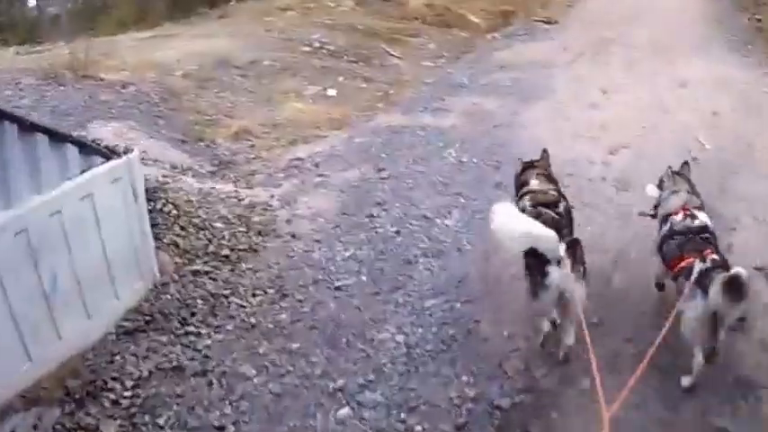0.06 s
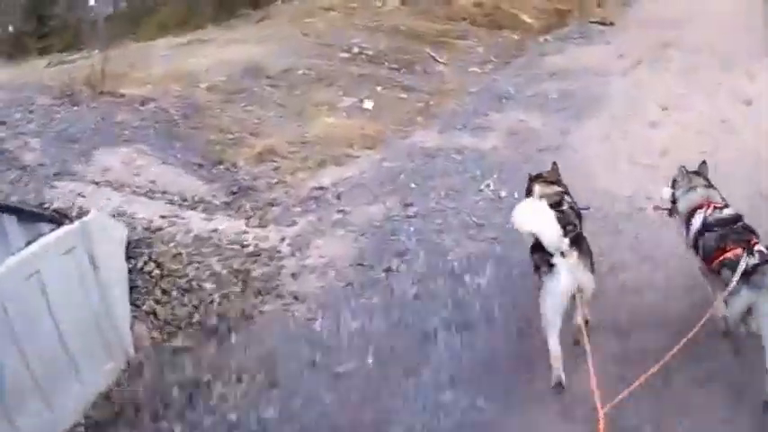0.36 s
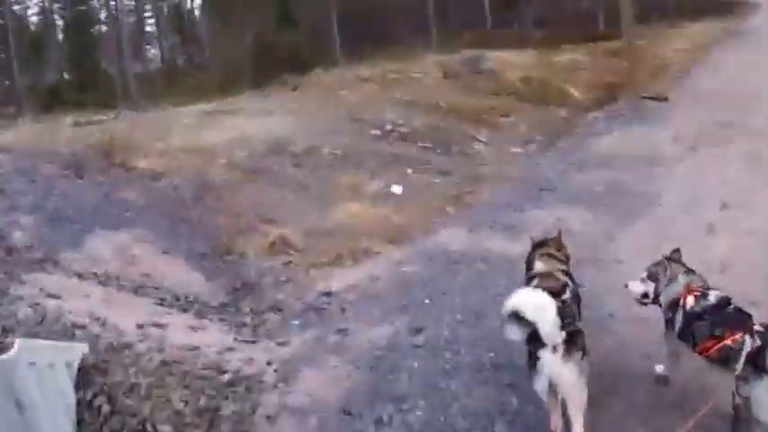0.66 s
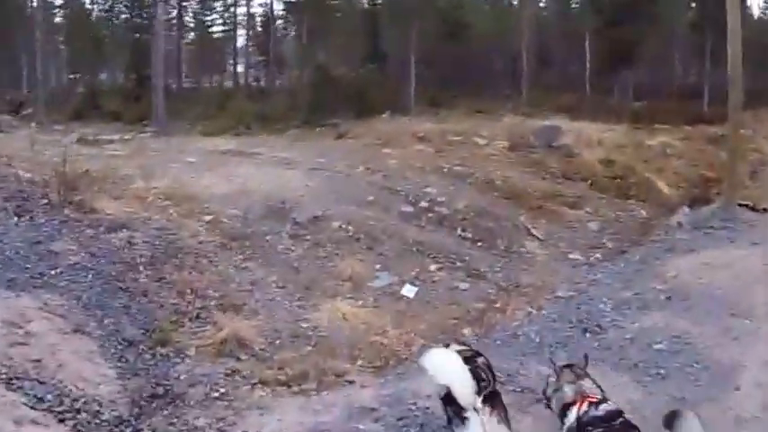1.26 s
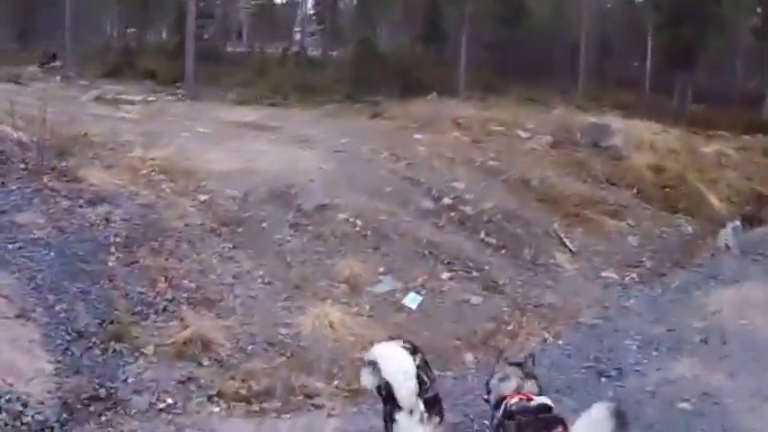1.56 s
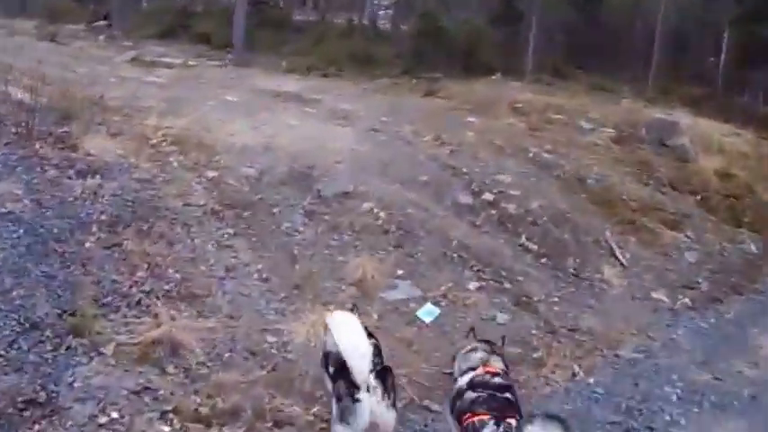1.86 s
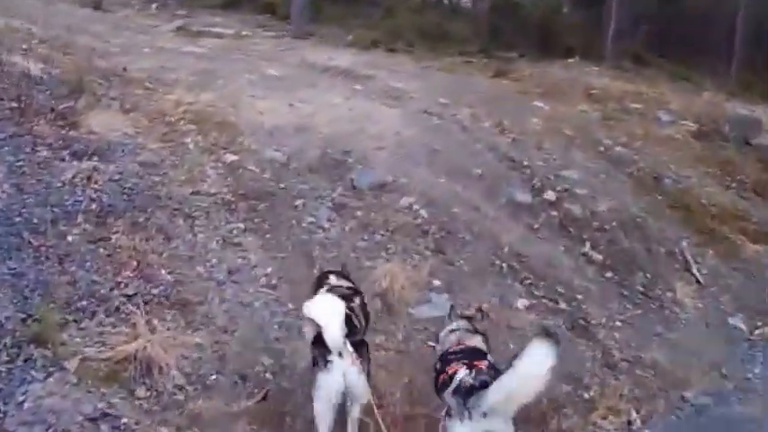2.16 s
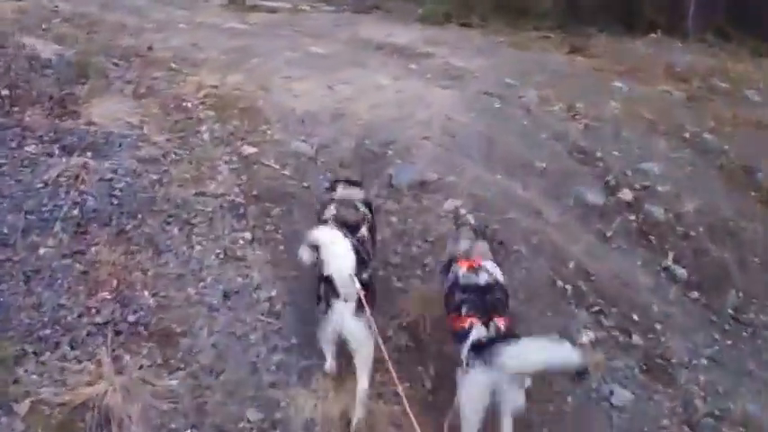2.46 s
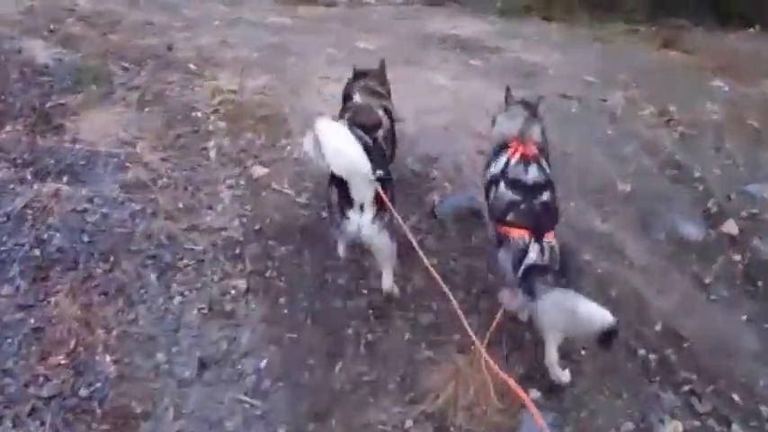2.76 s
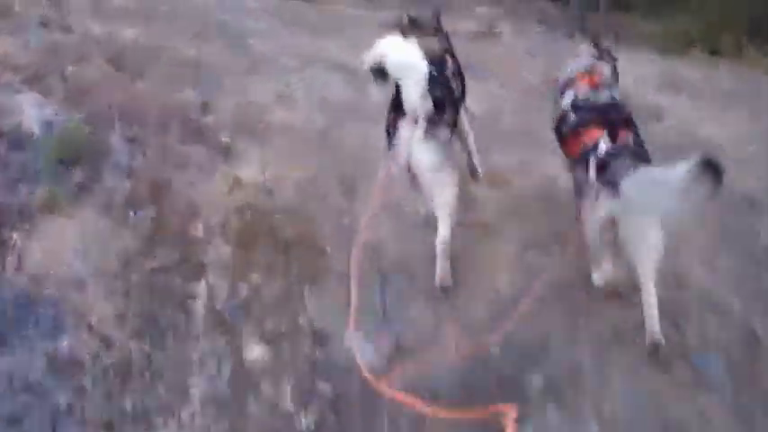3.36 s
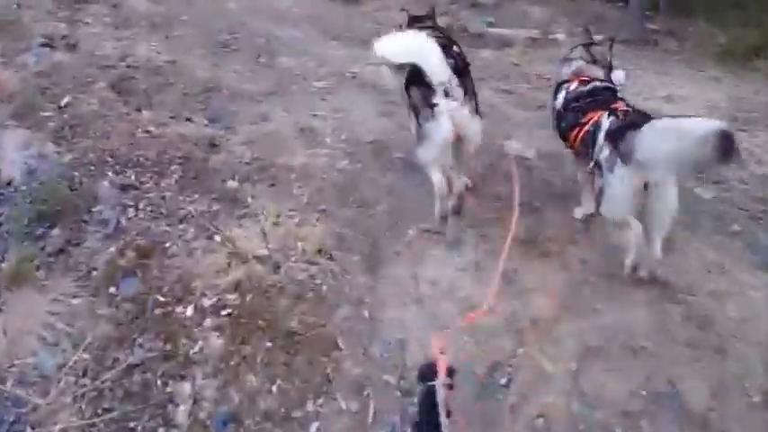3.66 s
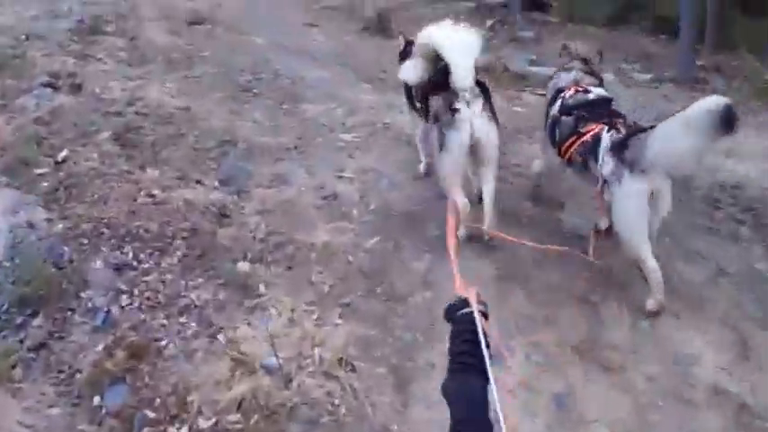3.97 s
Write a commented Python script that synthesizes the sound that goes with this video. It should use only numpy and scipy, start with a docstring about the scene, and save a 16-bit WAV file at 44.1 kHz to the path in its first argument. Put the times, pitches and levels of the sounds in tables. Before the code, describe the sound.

Wind buffets the microphone, fading, while bike tyres crunch over gravel and stones knock.

```python
"""Wind buffets the microphone, close up on a kickbike that two dogs pull off a gravel track and up a
dirt slope; the rumble dies away as the bike slows. Just below, the tyres crunch over stones and spray
grit, and larger stones knock and rattle the bike, ringing in the boxy camera housing.
Farther off, among the trees, a small bird whistles faintly."""
import sys
import numpy as np
from scipy import signal
from scipy.fft import rfft, irfft, next_fast_len
from scipy.io import wavfile
from scipy.ndimage import uniform_filter1d, map_coordinates

SR = 44100
rng = np.random.default_rng(int(sys.argv[2]) if len(sys.argv) > 2 else 0)


def wav_out(sig):
    """Save sig, one row per channel (or a flat mono array), as 16-bit PCM at SR to the path in sys.argv[1]."""
    wavfile.write(sys.argv[1], SR, np.round(np.clip(np.atleast_2d(sig).T, -1, 1) * 32767).astype(np.int16))


N = 176400

# stones shifting under the tyres: t/s, relative level/dB
CRUNCH_LEVEL = [(.4, -43), (1.37, -48), (3.53, -47), (3.78, -51), (4.0, -53.5)]
# fine grit and dust under the tread: t/s, relative level/dB
GRIT_LEVEL = [(0, -44), (.51, -46.5), (.97, -53), (1.86, -67), (2.8, -60), (4.0, -64.5)]
# response of the housing around the microphone: f/Hz, gain/dB
HOUSING_RESPONSE = [(300, -9), (620, -13.5), (870, -5), (1020, -8), (1250, -6), (1550, -4.5), (1780, 0.5),
                    (2050, -11), (2250, -21.5), (2550, -16), (2830, -13.5), (3280, -8), (3750, -21.5),
                    (4800, -26), (6200, -22), (9000, -36.5), (15000, -42)]
RING_HZ = 1950  # the sharpest resonance, which hard knocks bring out
GRAINS_PER_S = 5000


def wind(thump_half_width_s=0.0016):
    """Turbulence right at the microphone port: a rumble over a deep buffet, with a few hard eddies."""
    # strength of the wind: t/s, relative level/dB
    gusts = [(0, -14), (0.1, -27), (0.28, -20.5), (0.54, -22), (0.61, -25.5), (0.81, -29.5), (0.89, -25),
             (1.1, -26.5), (1.22, -22.5), (1.38, -26), (1.62, -24), (1.98, -25), (2.13, -26), (2.25, -29.5),
             (2.62, -33), (2.85, -24), (2.93, -30), (3.15, -29), (3.44, -39.5), (3.53, -32), (3.62, -40.5),
             (3.95, -46), (4.0, -57)]
    # spectrum of the rumble: f/Hz, gain/dB
    rumble_spectrum = [(40, -12), (90, -1), (140, 0.5), (240, -3), (370, -7), (440, -13), (590, -32),
                       (800, -34.5), (1200, -70.5)]
    # spectrum of the deep buffet: f/Hz, gain/dB
    buffet_spectrum = [(8, -9), (20, 1), (75, 0), (120, -11), (600, -99)]
    # pressure pulses of single hard eddies: t/s, peak level/dB
    thumps = [(0.0226, -11), (0.54, -12.5), (1.210, -11), (1.517, -15), (1.634, -12.5), (1.789, -11.5),
              (1.963, -14), (2.843, -12.5)]
    strength = level(gusts)
    rumble = colour(rng.standard_normal(N), lambda f: along(rumble_spectrum, f))
    buffet = colour(rng.standard_normal(N), lambda f: along(buffet_spectrum, f))
    eddies = amp(1.5 * wobble(per_s=45))
    out = amp(-1.5) * strength * unit(rumble * eddies)
    out += amp(-28.5) * unit(buffet * strength ** 0.91)  # swings a little less than the rumble
    for s, db in thumps:
        u = (clock() - s) / thump_half_width_s
        out += amp(db) * (1 - u * u) * np.exp(-u * u / 2)
    return out


def knocks(slip_rise_s=0.0023, scrape_decay_s=0.0039, gain_db=-4):
    """Larger stones hit the bike: a slip, a sharp contact and a brief scrape, ringing in the housing."""
    # stone strikes: t/s, relative peak level/dB, treble tilt/(dB per octave)
    strikes = [(.130, -17.5, -6), (.1362, -16, -6), (.328, -19, -7), (.4262, -19.5, 5), (.4328, -20, 1),
               (.441, -22, 9), (.573, -25, -6), (.616, -24.5, 6.5), (.844, -20, -8.5), (1.499, -24, 5),
               (1.798, -23.5, 5), (1.8598, -22, 2.5), (1.938, -23.5, 0), (2.0637, -24.5, -5.5),
               (2.396, -25, -1), (2.5795, -36, -2), (2.8792, -23, 3.5), (2.886, -23.5, 4.5),
               (2.903, -22.5, 1), (3.3599, -22.5, -13.5), (3.418, -24, 6), (3.527, -24, -5),
               (3.5645, -22, 1.5), (3.609, -20, 1.5), (3.6543, -27.5, -0.5), (3.730, -24.5, 2.5),
               (3.849, -22.5, -8.5)]
    lead = SR // 100  # samples of slip ahead of the contact
    t = (np.arange(SR // 20) - lead) / SR
    friction = np.where(t < 0, 0.2 * np.exp(-abs(t) / slip_rise_s), 0.16 * np.exp(-abs(t) / scrape_decay_s))
    out = np.zeros(N + SR)
    for s, db, tilt_db in strikes:
        force = friction * rng.standard_normal(len(t))
        force[lead] += 2  # the contact itself
        ring = colour(force, lambda f: knock_colour(f, tilt_db) + 0.5 * stone_timbre(f))
        start = round(s * SR) - lead
        out[start:start + len(t)] += amp(db + gain_db) * ring / np.abs(ring).max()
    return out[:N]


def knock_colour(hz, tilt_db, low_hz=1370, high_hz=3530, ring_half_width_hz=64):
    """The housing's answer to a larger stone, in dB: a middle band with one sharp resonance."""
    band = -10 * np.log10((1 + (low_hz / (hz + 1)) ** 6) * (1 + (hz / high_hz) ** 6))
    ring = 4.5 / (1 + ((hz - RING_HZ) / ring_half_width_hz) ** 2)
    tilt = tilt_db * np.log2(np.clip(hz, 500, 5000) / RING_HZ)
    return along(HOUSING_RESPONSE, hz) + band + ring + tilt


def stone_timbre(hz, depth_db=5, spacing_hz=230):
    """A stone's own random resonances, in dB."""
    return depth_db * map_coordinates(rng.standard_normal(128), [hz / spacing_hz], order=1, mode="nearest")


def crunch(stones_per_s=1000, timbres=18):
    """Clumps of small stones shift under the tyres, heard through the housing."""
    stones = np.zeros(N)
    for _ in range(timbres):
        impacts = contacts(stones_per_s / timbres, spread_db=1)
        stones += unit(colour(impacts, lambda f: along(HOUSING_RESPONSE, f) + stone_timbre(f)))
    clumps = amp(0.8 + 2 * wobble(per_s=34.98))
    return clumps * level(CRUNCH_LEVEL) * unit(stones)


def scuffs():
    """A quick run of larger stones rattles as the tyre ploughs through them."""
    # patches of stones: t/s, level/dB, half length/s
    patches = [(.165, -38, 0.01), (.222, -39.5, 0.043), (.45, -34.5, 0.032), (.622, -41.5, 0.035),
               (3.235, -43, 0.035), (3.377, -41, 0.02), (3.562, -35.5, 0.016)]
    stones = contacts(per_s=700, spread_db=1.5)
    return swells(patches) * unit(colour(stones, lambda f: knock_colour(f, tilt_db=0)))


def pebbles(per_s=320, low_hz=1095, high_hz=7600, decay_cycles=7.2):
    """Pebbles clink together in clusters, each with its own short ring."""
    clusters = amp(4 * wobble(per_s=22))
    starts = np.flatnonzero(rng.random(N) < per_s / SR * clusters)
    pitch, force = rng.random((len(starts), 2)).T[:, :, None]
    hz = low_hz * (high_hz / low_hz) ** pitch
    age = np.arange(SR // 40)  # samples
    cycles = hz * age / SR
    small_lift_db = 2.5 * np.log2(hz / RING_HZ)
    gain = amp(along(HOUSING_RESPONSE, hz) + small_lift_db + 2 * force)
    rings = gain * np.sin(2 * np.pi * cycles) * np.exp(-cycles / decay_cycles) * (1 - np.exp(-cycles))
    clinks = np.bincount((starts[:, None] + age).ravel(), rings.ravel(), N)[:N]
    return amp(-6) * level(CRUNCH_LEVEL) * unit(clinks)


def grit():
    """Fine grains fizz under the tread and now and then spray out."""
    # spectrum of the fizz: f/Hz, gain/dB
    fizz_spectrum = [(2500, -75), (4000, -3.5), (4800, -8.5), (6200, 1.5), (7400, -3), (8900, -20),
                     (11000, -18), (15600, -13)]
    # grit thrown from the tyre: t/s, level/dB, half length/s
    sprays = [(.213, -46.5, 0.032), (.266, -41, 0.0084), (.89, -55, 0.049), (1.3, -60, 0.36),
              (1.832, -51, .02), (2.209, -54.5, 0.018), (3.055, -51.5, 0.014), (3.41, -53.5, .019),
              (3.555, -57.5, .07)]
    grains = patchy(contacts(GRAINS_PER_S, spread_db=3))
    under_tread = amp(-5.5 + 0.6 * wobble(per_s=28.6)) * level(GRIT_LEVEL)
    return np.hypot(under_tread, swells(sprays)) * unit(colour(grains, lambda f: along(fizz_spectrum, f)))


def sand(low_edge_hz=10500):
    """The finest sand spits in uneven bursts, thinning with the grit as the bike slows."""
    # sand hitting the bike: t/s, level/dB, half length/s
    spits = [(.204, -44.5, 0.0083), (.269, -56, .011), (.705, -46.5, 0.0087), (.857, -54.5, .015)]
    impacts = contacts(GRAINS_PER_S, spread_db=8)
    grains = colour(impacts, lambda f: -10 * np.log10(1 + (low_edge_hz / (f + 1)) ** 10))
    stream = amp(-63.5) * unit(level(GRIT_LEVEL) ** 0.64 * amp(3.5 * wobble(per_s=33.5)))
    return np.hypot(stream, swells(spits)) * unit(patchy(grains))


def ping(start_s=3.418, t60_s=0.19):
    """One stone sets a thin metal part of the bike ringing faintly."""
    # modes of the metal part: f/Hz, level/dB
    modes = [(3757, -52.5), (9575, -60)]
    t = np.maximum(clock() - start_s, 0)
    return sum(amp(db - 60 * t / t60_s) * np.sin(2 * np.pi * hz * t) for hz, db in modes)


def bird(waver_hz=50, flutter_db=3, forest_db=-8, forest_t60_s=0.12):
    """Thin, unsteady whistles glide in arcs, scattered by the trees on their way to the microphone."""
    # whistles: start t/s, length/s, first f/Hz, middle f/Hz, last f/Hz, level/dB
    whistles = [(0.868, 0.06, 4750, 5300, 5550, -57), (2.661, .022, 5700, 5280, 6000, -54),
                (3.049, 0.096, 4650, 5480, 4560, -53.5)]
    song = np.zeros(N)
    waver = waver_hz * wobble(per_s=250)
    for s, length, *pitch_hz, db in whistles:
        progress = np.clip((clock() - s) / length, 0, 1)
        hz = np.polyval(np.polyfit([0, 0.5, 1], pitch_hz, 2), progress) + waver
        song += amp(db) * np.sin(np.pi * progress) * np.sin(2 * np.pi * np.cumsum(hz) / SR)
    song *= amp(flutter_db * wobble(per_s=120))
    tail = rng.standard_normal(SR // 2) * amp(-60 * np.arange(SR // 2) / SR / forest_t60_s)
    return song + amp(forest_db) * signal.fftconvolve(song, tail / np.linalg.norm(tail))[:N]


def hiss(whine_hz=15277):
    """The noise floor: microphone hiss and the camera's faint whine."""
    return amp(-65) * rng.standard_normal(N) + amp(-76) * np.sin(2 * np.pi * whine_hz * clock())


def contacts(per_s, spread_db):
    """Random tiny impacts of uneven size."""
    size = amp(spread_db * np.minimum(rng.standard_normal(N), 2))
    return (rng.random(N) < per_s / SR) * size * rng.choice([-1, 1], N)


def patchy(x, depth_db=2.5):
    """Give a sound short patches of random gain in time and pitch."""
    spectra = signal.stft(x, nperseg=256)[2]
    patches = uniform_filter1d(rng.standard_normal(spectra.shape), size=6, axis=0)
    patches = uniform_filter1d(patches, size=7, axis=1)
    return signal.istft(spectra * amp(depth_db * unit(patches)), nperseg=256)[1][:N]


def colour(x, db_at):
    """Minimum-phase filter whose gain in dB is a function of frequency."""
    m = 2 * next_fast_len(len(x) // 2 + 4096)
    gain = amp(db_at(np.fft.rfftfreq(m, 1 / SR)))
    cepstrum = irfft(np.log(gain + 1e-6), m)
    cepstrum[1:m // 2] *= 2
    cepstrum[m // 2 + 1:] = 0
    return irfft(rfft(x, m) * np.exp(rfft(cepstrum)), m)[:len(x)]


def swells(rows):
    """Gain per sample of bell-shaped swells, from rows of t/s, level/dB, half length/s."""
    return sum(amp(db) * np.exp(-((clock() - s) / half_s) ** 2) for s, db, half_s in rows)


def level(rows):
    """Gain per sample from rows of t/s, level/dB."""
    return amp(np.interp(clock(), *np.transpose(rows)))


def along(rows, hz):
    """Interpolate rows of f/Hz, gain/dB on a log frequency axis."""
    f, db = np.transpose(rows)
    return np.interp(np.log(hz + 1), np.log(f + 1), db)


def wobble(per_s):
    """A smooth random curve with per_s knots a second."""
    return map_coordinates(rng.standard_normal(2048), [clock() * per_s], mode="wrap")


def amp(db):
    """Decibels to gain."""
    return 10 ** (np.asarray(db) / 20)


def unit(x):
    """Scale to rms 1."""
    return x / np.sqrt(np.mean(x ** 2) + 1e-20)


def clock():
    """The time of every sample in seconds."""
    return np.arange(N) / SR


def scene():
    """Everything reaches the rider's one microphone in the open air."""
    close = wind() + crunch() + pebbles() + scuffs() + grit() + sand() + knocks() + ping()
    return (close + bird() + hiss())[None]


def record(dry, top_hz=15680):
    """The camera keeps nothing above its band limit."""
    m = next_fast_len(N + SR // 2)
    passband = np.fft.rfftfreq(m, 1 / SR) < top_hz
    return irfft(rfft(dry, m) * passband, m)[..., :N]


dry = scene()
out = record(dry)
wav_out(out)
```